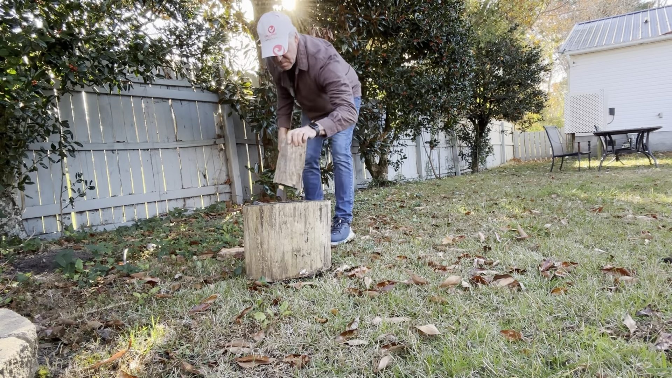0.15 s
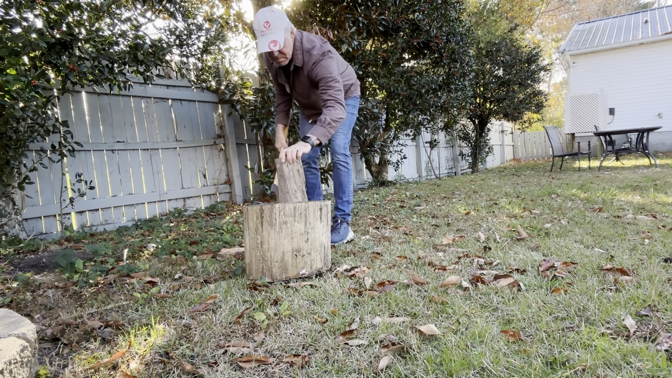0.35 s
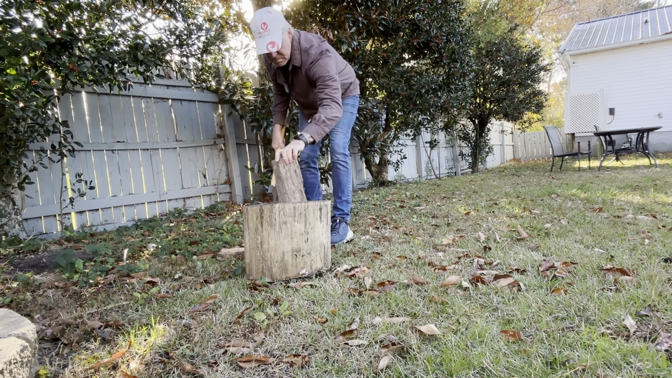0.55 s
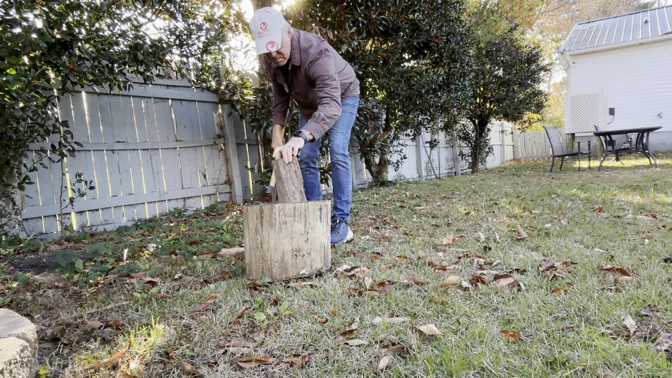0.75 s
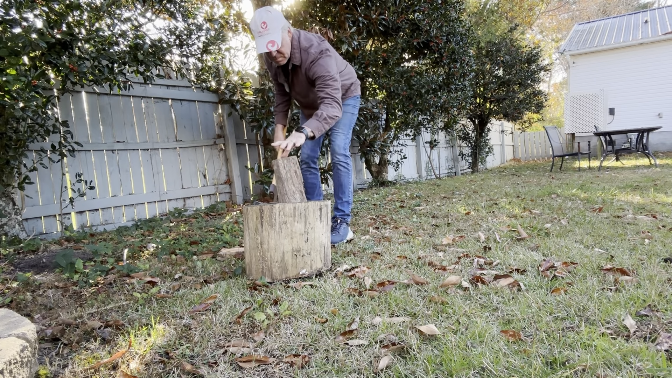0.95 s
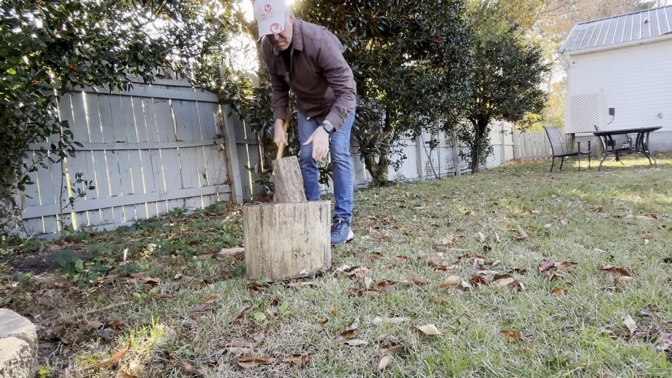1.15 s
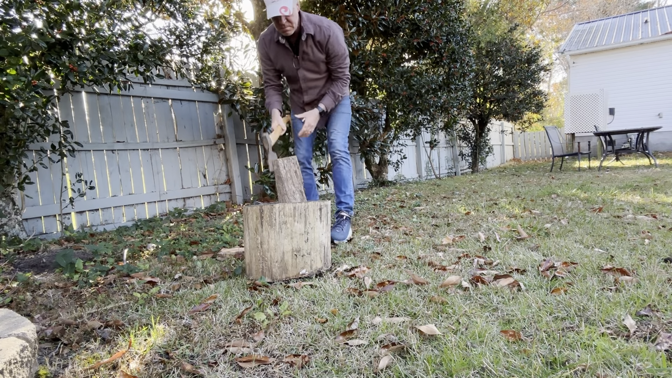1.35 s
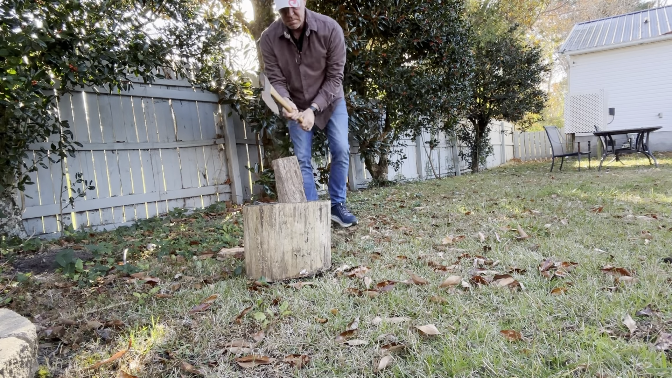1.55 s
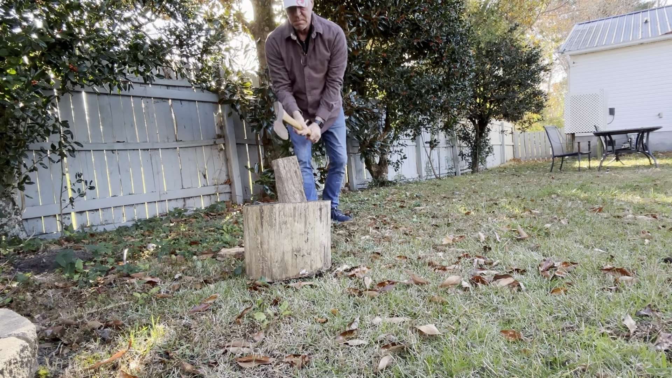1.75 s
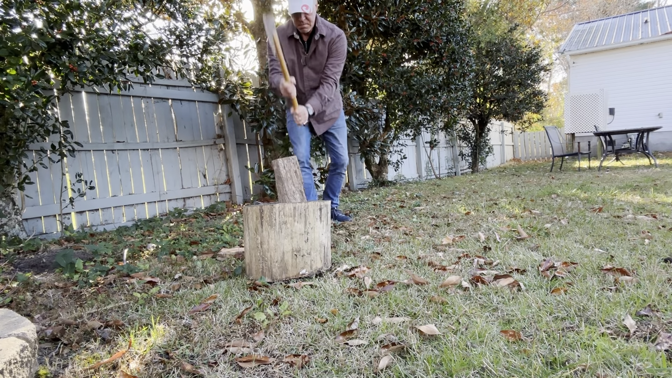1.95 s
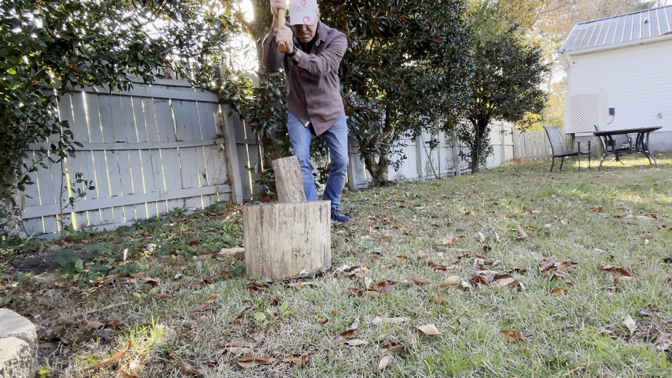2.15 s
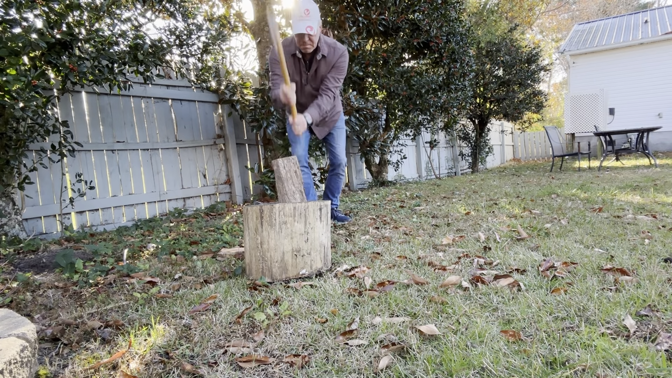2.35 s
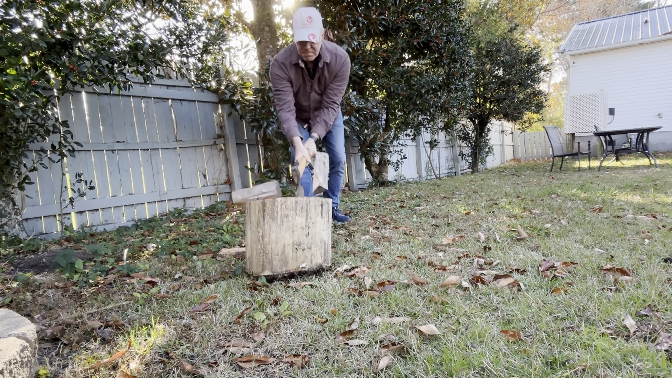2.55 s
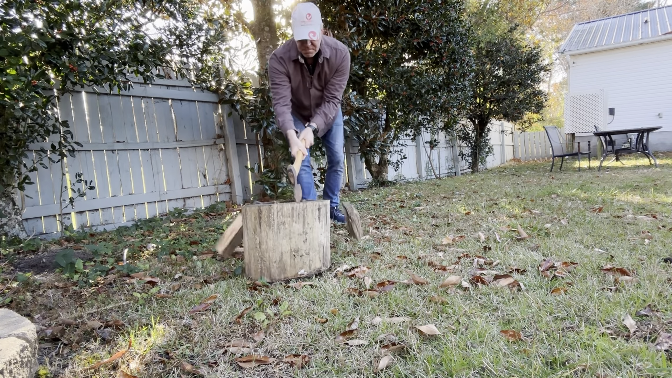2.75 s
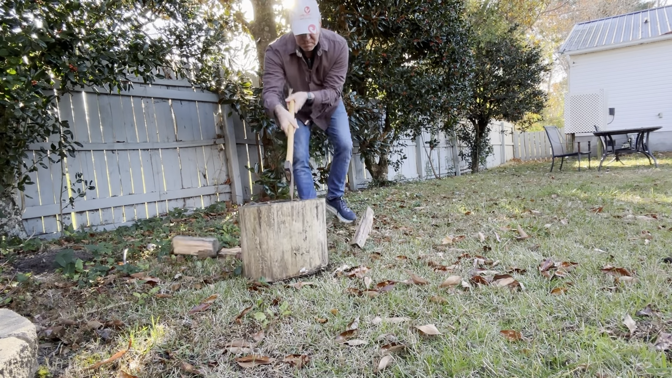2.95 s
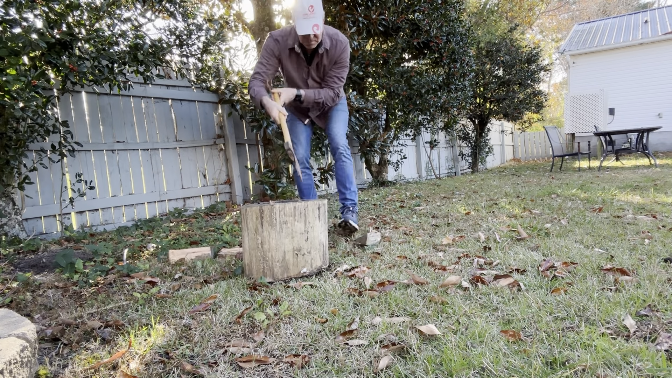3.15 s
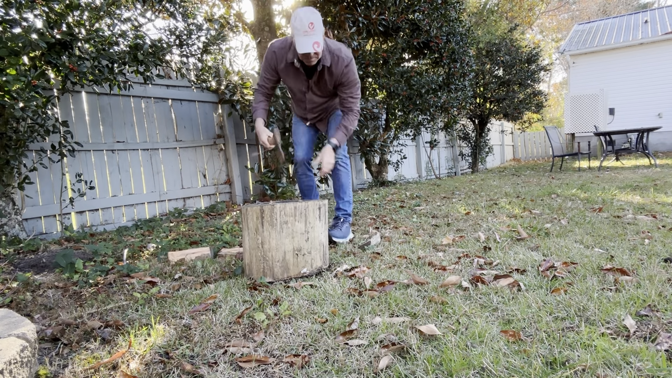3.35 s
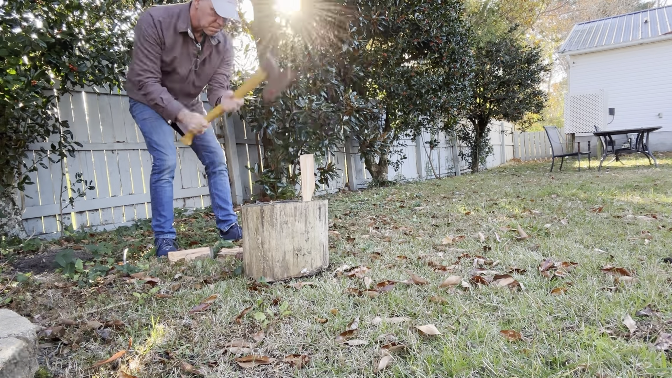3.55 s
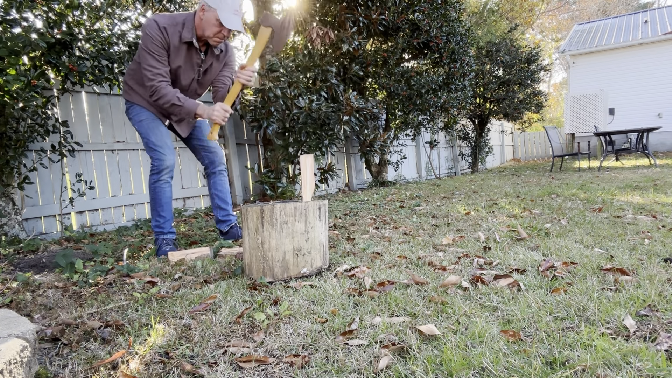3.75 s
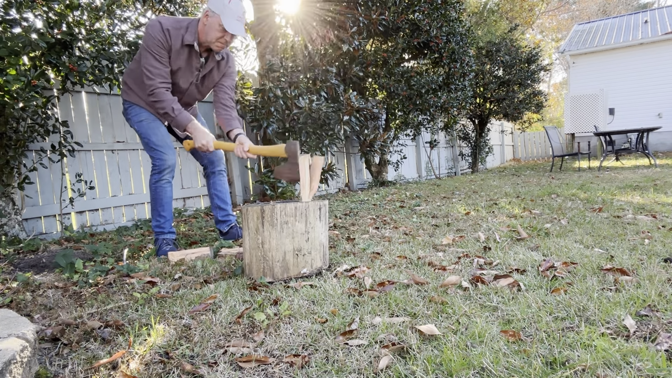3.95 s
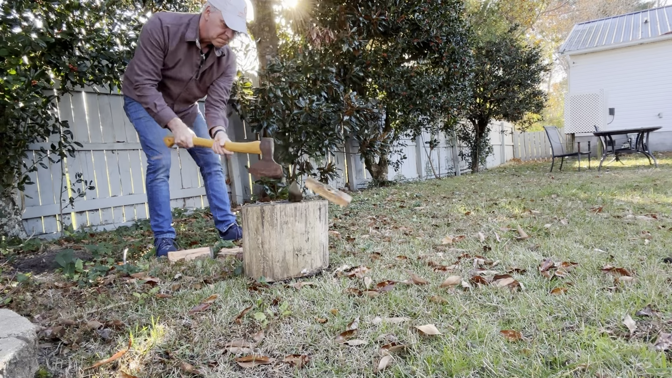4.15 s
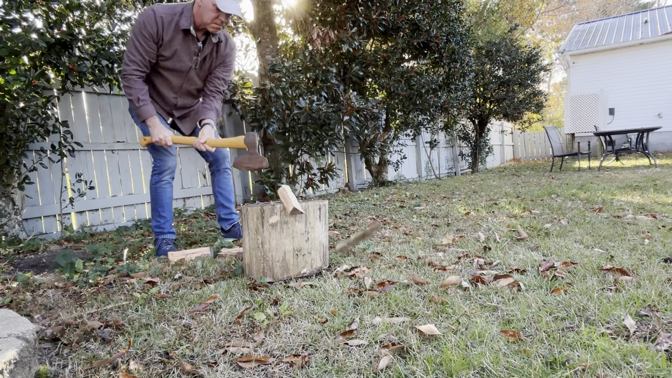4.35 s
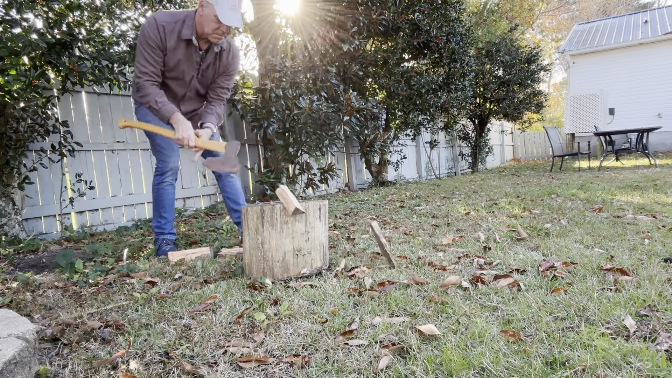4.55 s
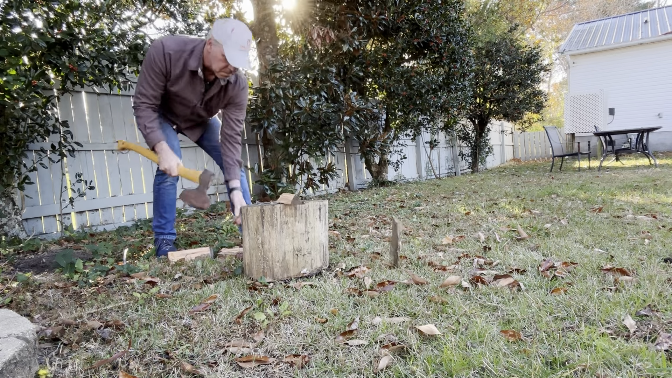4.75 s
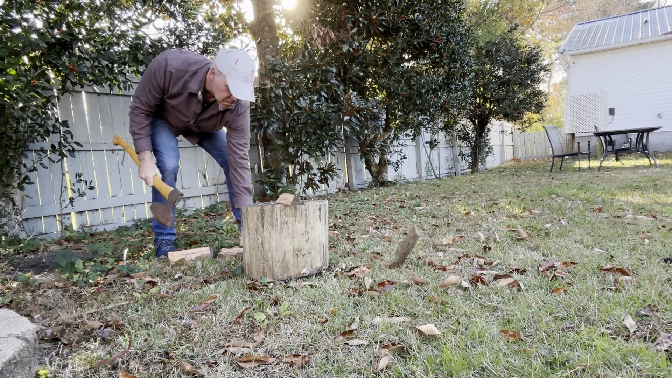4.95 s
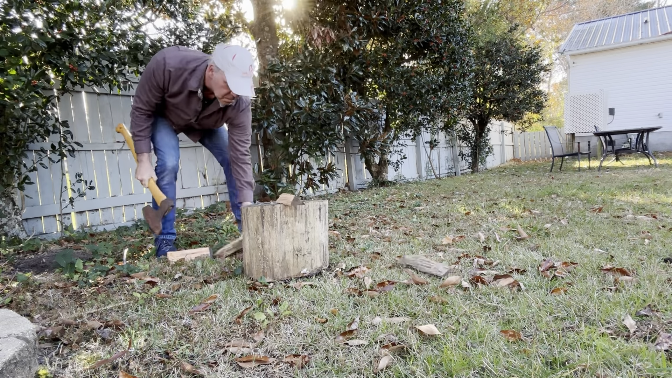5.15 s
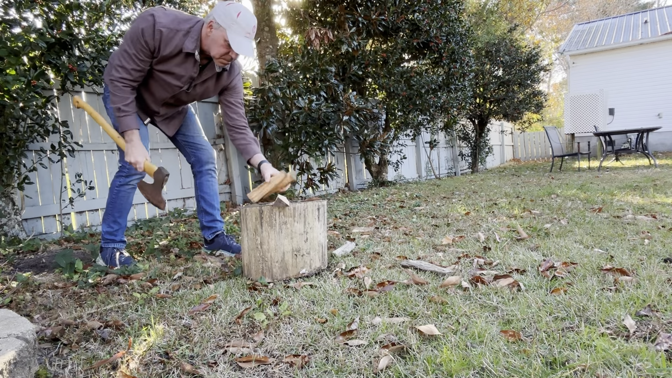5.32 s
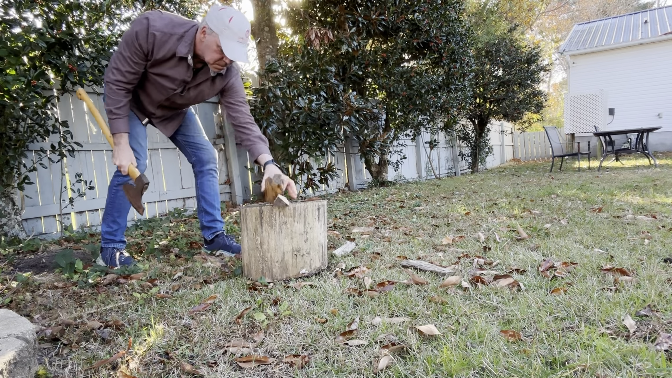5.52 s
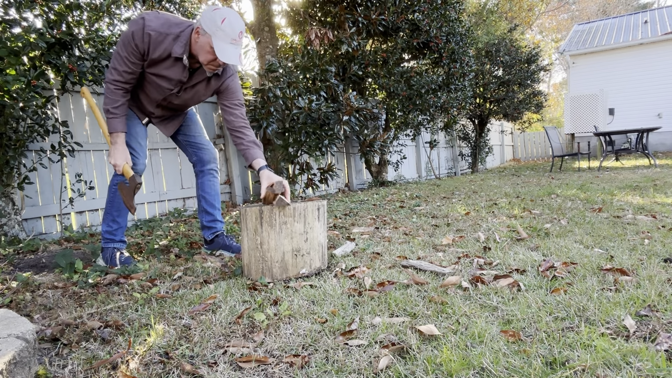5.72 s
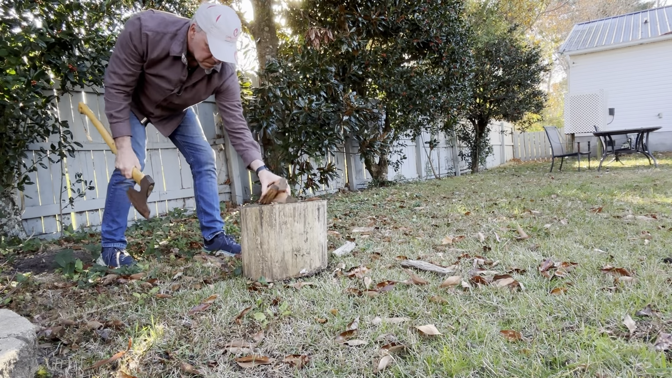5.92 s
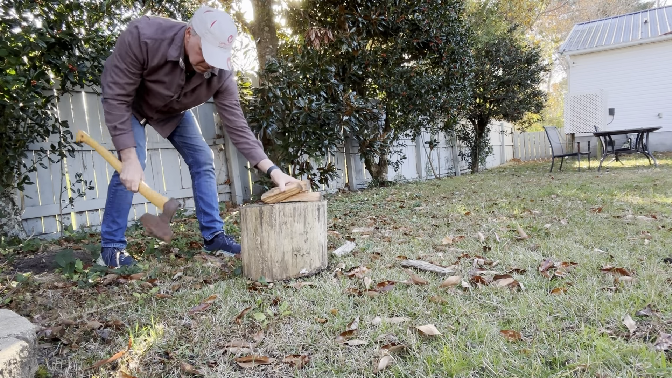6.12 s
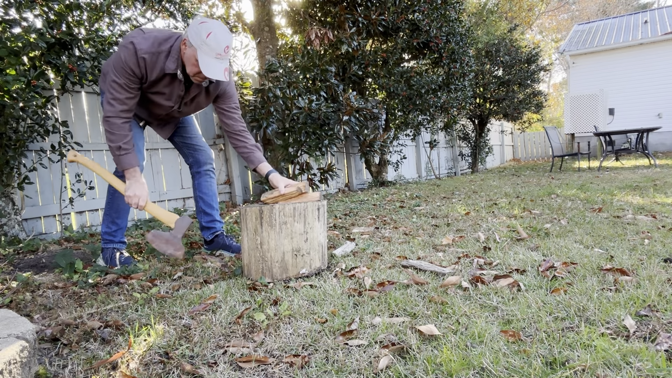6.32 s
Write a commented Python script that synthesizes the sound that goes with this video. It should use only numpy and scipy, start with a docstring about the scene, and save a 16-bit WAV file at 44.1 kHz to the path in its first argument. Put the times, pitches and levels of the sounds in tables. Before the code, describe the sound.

A low outdoor rumble, a steady machine hum and distant traffic run throughout. A far engine swells three times in the first two seconds and sinks to idle. There is a faint wooden tap at 0.4 seconds, and feet shuffle softly in dry leaves around 1.3 to 1.7. At 2.4 a hatchet splits wood on a stump, near and slightly left: a loud crack and thump with a short backyard echo. The halves knock on the stump and crunch into leaves between 2.5 and 3.1, followed by light steps. A second, brighter chop with splintering snaps and a quick fence echo lands at 3.9. Pieces clatter until 4.3 and drop into leaves around 4.5, amid more shuffling. From 5.5 to 6.2, kindling quietly taps and scrapes on the stump. The engine fades near 5.9 while the hum continues.

```python
"""A hatchet splits kindling on a stump in a fenced backyard, over a steady hum and distant traffic.
First a far engine swells and sinks to idle while feet shuffle through dry leaves. At 2.4 s the blade
lands: a crack and a falling thump that fence and trees throw back, then the halves knock on the stump
and drop into the leaves. A second chop follows at 3.9 s. Last, kindling scrapes and taps on the stump
among more shuffling, and the engine fades away."""
import sys
import numpy as np
from scipy import signal
from scipy.fft import rfft, irfft
from scipy.io import wavfile
from scipy.ndimage import uniform_filter1d

SR = 44100
rng = np.random.default_rng(int(sys.argv[2]) if len(sys.argv) > 2 else 0)


def inscribe(sig):
    """Save sig as 16-bit PCM at rate SR to the path in sys.argv[1].

    A 1-D sig is mono; a 2-D sig holds one channel per row.
    Samples are clipped to [-1, 1] before scaling.
    """
    pcm = np.round(np.clip(np.atleast_2d(sig).T, -1, 1) * 32767)
    wavfile.write(sys.argv[1], SR, pcm.astype(np.int16))


N = 281358
TIME = np.arange(N) / SR

# The two chops. Each row: start in seconds, crack level in dB, rise in seconds, tilt in dB per octave,
# tear level in dB, tear decay in seconds, yard level in dB, yard tilt in dB per octave, fence echo in dB.
CHOP_CUES = [(2.4393, -10, 0.00072, -0.5, -41, 0.035, 13.5, -1.57, -16),
             (3.8979, -12, 0.0014, 1.65, -26.5, 0.012, 3, 1.95, 5)]
# The tone of cracking wood. Each row: frequency in Hz, relative level in dB.
CRACK_EQ = [(200, -13.5), (700, -0.5), (1200, 11), (1600, -14), (2200, -3.5), (3200, -9), (5000, 0.5),
            (7000, -4.5), (8500, -11), (10500, -14), (13000, -6.5), (16000, -21)]

def chops():
    """The blade bursts the wood open and the fibres tear; gives the near sound and the yard's answer."""
    near, far = np.zeros((2, 2, N))
    t = np.arange(SR // 3) / SR
    for s, crack_db, rise, tilt_db, tear_db, tear_decay, yard_db, yard_tilt_db, fence_db in CHOP_CUES:
        burst = crackle(len(t), spread_db=-0.5, apart=0.5)
        crack = unit_rms(coloured(burst, CRACK_EQ, tilt_db)) * swell(t, rise)
        jerks = smooth_noise(len(t), samples=60)  # the fibres give way in bundles
        fibres = patchy(crackle(len(t), spread_db=7, apart=0.5), depth_db=4)
        fibres = coloured(fibres * gain_of(4 * np.minimum(jerks, 2)), CRACK_EQ, tilt_db)
        tear = unit_rms(fibres) * np.exp(-t / tear_decay) * (1 - np.exp(-t / rise))
        add(near, s, gain_of(crack_db) * crack + gain_of(tear_db) * tear)
        add(far, s, gain_of(yard_db) * yard(yard_tilt_db, fence_db))
    return near, far


# Hits on wood, by the blade or a loose piece. Each row: start in seconds, thump level in dB,
# starting pitch in Hz, natural-log growth of the period per cycle, rise in seconds.
KNOCK_CUES = [(0.354, -41.5, 450, 0.93, .0024), (2.4402, -5.5, 950, 0.274, 0.0018),
              (2.452, -27.5, 350, 0.046, 0.0046), (2.4743, -13, 980, 0.38, 0.0018),
              (2.4836, -12, 195, 0.62, 0.0045), (2.523, -44, 900, 0.27, .002),
              (2.573, -16, 273, 0.12, 0.0028), (2.677, -37, 340, 0.165, 0.0046),
              (2.803, -29.5, 454, .45, 0.0098), (3.8979, -11, 947, 0.22, 0.0027),
              (3.9071, -12, 331, 0.047, 0.0023), (4.116, -30.5, 937, 0.26, 0.0021),
              (4.137, -36, 486, 0.12, 0.0016), (4.1959, -20, 1160, 0.15, 0.00052),
              (4.207, -32, 315, 0.14, 0.0017), (4.278, -32.5, 565, 0.13, 0.0021),
              (5.526, -43, 672, 0.16, 0.0036), (5.552, -38, 710, 0.39, 0.0046),
              (5.567, -43, 625, 0.067, .0044), (5.926, -45.5, 317, .02, 0.0054)]

def knocks():
    """A blow sends a thump through the wood; its highs arrive first, so the pitch falls."""
    out, t = np.zeros((2, N)), np.arange(SR // 3) / SR
    for s, thump_db, hz, growth, rise in KNOCK_CUES:
        # Harder and higher knocks ring and tick more; a usual one is -30 dB at 500 Hz.
        force_db, octaves = thump_db + 30, np.log2(hz / 500)
        ring_db = -38.5 + 0.7473 * force_db + octaves
        tick_db = -54.5 + 0.64 * force_db + 6.5 * octaves
        turns = np.log1p(growth * hz * t) / growth
        bumps = unit_rms(uniform_filter1d(smooth_noise(len(t), samples=110), size=80))
        contact = 1 + 0.187 * bumps  # rough faces touch unevenly
        thump = np.sin(2 * np.pi * turns) * swell(t, rise) * contact
        burst = crackle(len(t), spread_db=-0.5, apart=0.41)
        tick = unit_rms(coloured(burst, CRACK_EQ, tilt_db=-1)) * swell(t, rise=0.0023)
        ring = wood_ring(t, hz)
        add(out, s, gain_of(thump_db) * thump + gain_of(tick_db) * tick + gain_of(ring_db) * ring)
    return out


# The ring of billet and stump. Each row: pitch in Hz, relative level in dB, seconds to fall 60 dB.
WOOD_MODES = [(323, 9, 0.057), (352, -13, 0.11), (466.3, 12, 0.049), (514, -6.5, 0.061), (610, -11, 0.069),
              (732, 5, 0.046), (802, -13, 0.066), (892, -11.5, 0.049), (1250, -31.5, 0.027),
              (1340, -6.5, 0.051), (1536, -10.5, 0.12), (1960, -8.5, 0.088), (2008, -13, 0.029),
              (2670, -17.5, .08), (3480, -20, .1)]

def wood_ring(t, knock_hz):
    """The wood's modes ring on, with slightly different tuning and phase for every blow."""
    hz, db, t60 = np.transpose(WOOD_MODES)[:, :, None]
    phase, detune, skew = rng.standard_normal((3, len(WOOD_MODES), 1))
    angle = 2 * np.pi * (hz * (1 + 0.011 * detune) * t + phase)
    dull_db = 5.5 * np.maximum(np.log2(hz / knock_hz), 0)  # a soft blow hardly wakes the high modes
    fade = gain_of(db - dull_db - 60 * t / t60) * (1 - np.exp(-t / 0.00022))
    return np.array([(fade * np.sin(angle + side * skew)).sum(0) for side in (-0.5, 0.5)]) / 2


# Snaps as the halves part. Each row: start in seconds, level in dB, tilt in dB per octave.
SNAP_CUES = [(2.456, -37, 7), (2.4653, -29.5, -4), (2.4928, -42, 12), (2.5012, -46.5, 12),
             (2.5232, -35.5, -2.5), (3.9022, -17, 6), (3.9036, -26, 15)]

def splinters():
    """The last fibres snap, each with a very short burst."""
    out, t = np.zeros((2, N)), np.arange(SR // 20) / SR
    for s, db, tilt_db in SNAP_CUES:
        burst = coloured(crackle(len(t), spread_db=-4, apart=0.21), CRACK_EQ, tilt_db)
        add(out, s, gain_of(db) * unit_rms(burst) * swell(t, rise=0.0012))
    return out


# Kindling dragged over the stump. Each row: start in seconds, level in dB, rise in seconds.
SCRAPE_CUES = [(4.4872, -47, 0.0025), (5.521, -51, 0.0075), (5.552, -50.5, 0.012), (5.68, -58, 0.024),
               (5.86, -56.5, 0.036), (5.921, -48, 0.0054), (6.07, -56.5, 0.016), (6.142, -56.5, 0.022)]
# The hollow tone of the drag. Each row: frequency in Hz, relative level in dB.
SCRAPE_EQ = [(200, 6), (500, 9.5), (1200, -16), (1950, -1), (2900, -14.5), (4000, -3.5), (6000, -15),
             (15000, -31.5)]

def scrapes():
    """Rough wood slips over the end grain in tiny jerks."""
    out, t = np.zeros((2, N)), np.arange(SR // 3) / SR
    for s, db, rise in SCRAPE_CUES:
        rasp = coloured(crackle(len(t), spread_db=6, apart=0.64), SCRAPE_EQ)
        add(out, s, gain_of(db) * unit_rms(rasp) * swell(t, rise))
    return out


# The stump's stereo placement. Each row: frequency in Hz, left over right in dB.
STUMP_PAN = [(200, -2.5), (700, -1.5), (1300, 9.5), (2800, 15), (5000, 1.5), (7000, 13), (9500, 1),
             (15000, 2)]

def direct(pair, lag_s):
    """The stump stands a little to the left, so its sound reaches the right microphone later."""
    left, right = rfft(pair)
    hz = bins(pair)
    lean = gain_of(curve_at(STUMP_PAN, hz) / 2)
    delay = np.exp(-2j * np.pi * hz * lag_s)
    return irfft(np.array([left * lean, right / lean * delay]), N)


# A foot or sleeve brushing the leaves. Each row: start in seconds, level in dB, seconds to its peak.
SHUFFLE_CUES = [(0.0, -82, .2), (1.16, -82, .12), (1.325, -54, 0.082), (1.585, -54.5, 0.053),
                (2.85, -61, 0.19), (3.06, -67, 0.033), (3.15, -59, 0.064), (3.35, -64.5, 0.071),
                (3.62, -78, .18), (4.275, -63, 0.029), (4.4, -55.5, 0.08), (4.501, -57, 0.056),
                (4.62, -73, 0.11), (4.939, -62, 0.098), (5.064, -62.5, 0.067), (5.175, -68, 0.05),
                (5.55, -63, 0.013), (5.62, -72, 0.15), (5.82, -72, 0.14), (6.059, -64.5, .06)]
# The crisp tone of dry leaves. Each row: frequency in Hz, relative level in dB.
LEAF_EQ = [(300, -24.5), (1500, -11), (3300, -6), (5300, 1), (7200, 1.5), (9000, -5), (10500, -7.5),
           (11800, 5), (14200, -2), (16000, -13.5)]

def shuffles():
    """Dry leaves crackle softly under shuffling feet and stir faintly between steps."""
    sweep_power = 2.37  # a sweep starts more softly and ends sooner than a blow
    sweeps = [gain_of(db) * swell(np.maximum(TIME - s, 0), rise) ** sweep_power
              for s, db, rise in SHUFFLE_CUES]
    pressure = gain_of(-90) + np.linalg.norm(sweeps, axis=0)
    grains = unit_rms(coloured(crackle(N, spread_db=6, apart=1), LEAF_EQ, tilt_db=-1.5))
    return panned(pressure * grains * gain_of(1.2 * drift(rate_hz=120)), side_db=2)


# Leaf crunches. Each row: start in seconds, level in dB, rise in seconds, tilt in dB per octave.
CRUNCH_CUES = [(1.118, -66.5, 0.018, -7), (1.526, -49, 0.0012, -2), (1.597, -55.5, 0.0063, -1),
               (1.645, -50.5, 0.017, -5.5), (2.783, -42.5, 0.011, -2), (3.0, -45, 0.0057, -4.5),
               (3.022, -36.5, 0.0022, -2), (3.068, -45, 0.0069, -2.5), (4.028, -60, 0.0012, 5),
               (4.406, -47.5, 0.0064, -1), (4.4872, -43.5, 0.0042, -6.5), (4.571, -41, 0.0013, 13),
               (5.195, -55, .004, -3), (6.25, -63.5, 0.0018, -2)]

def crunches():
    """Under a foot or a falling piece one leaf after another gives way, crackling in clumps."""
    out, t = np.zeros((2, N)), np.arange(SR // 3) / SR
    for s, db, rise, tilt_db in CRUNCH_CUES:
        clumps_db = 2.5 * np.minimum(smooth_noise(len(t), samples=70), 2.6)
        grains = patchy(crackle(len(t), spread_db=9.5, apart=0.93), depth_db=1.5)
        crunch = unit_rms(coloured(grains * gain_of(clumps_db), LEAF_EQ, tilt_db))
        add(out, s, panned(gain_of(db) * crunch * swell(t, rise), side_db=4.5))
    return out


# The tone of the yard's reverb. Each row: frequency in Hz, gain in dB.
YARD_EQ = [(100, 7), (400, 8.5), (750, 2), (1150, 1), (2000, -1.5), (3500, -3), (5000, -3.5), (7000, -5.5),
           (10000, -12.5), (16000, -22)]
# The length of its tail. Each row: frequency in Hz, seconds to fall 60 dB.
YARD_DECAY = [(150, 0.28), (700, 0.46), (2000, 0.64), (4500, 0.6), (7500, 0.48), (11000, 0.37),
              (16000, 0.19)]

def yard(tilt_db, fence_db, fence_s=0.055):
    """The yard's answer to a click: trees and ground scatter a tail, the fence returns a smeared echo."""
    scatter = patchy(rng.standard_normal((2, SR)), depth_db=3)
    hz, frame_s, bands = signal.stft(scatter, SR, nperseg=256)
    decay = gain_of(-60 * frame_s / curve_at(YARD_DECAY, hz)[:, None])
    tail = signal.istft(bands * decay, SR, nperseg=256)[1][:, :SR]
    t = np.arange(SR) / SR
    fence = gain_of(fence_db) * np.exp(-((t - fence_s) / 0.0025) ** 2)
    ground = 1.6 * np.exp(-t / 0.032)
    tail = tail * (1 - np.exp(-t / 0.0059)) * (1 + ground + fence)
    return diffuse(coloured(tail / np.linalg.norm(tail[0]), YARD_EQ, tilt_db))


# The engine slowing to idle. Each row: time in seconds, pitch in Hz.
ENGINE_PITCH = [(0, 75.15), (.3, 65.08), (.95, 64.96), (1.25, 53.29), (6.38, 57.7)]
# Its three swells. Each row: peak time in seconds, level in dB, half length in seconds.
ENGINE_SWELL_CUES = [(.45, -43, 0.33), (1.427, -43, .15), (2.084, -44, 0.19)]

def engine(idle_db=-47.5, gone_s=5.92, fade_s=0.06):
    """The low note of a far engine wavers, swells, sinks to idle and fades away."""
    hz = np.interp(TIME, *np.transpose(ENGINE_PITCH)) * (1 + 0.021 * drift(rate_hz=7.2))
    note = np.sqrt(2) * np.sin(2 * np.pi * np.cumsum(hz) / SR)
    idle = gain_of(idle_db) * (1 - np.tanh((TIME - gone_s) / fade_s)) / 2
    swells = sum(gain_of(db) * np.exp(-((TIME - s) / half) ** 2) for s, db, half in ENGINE_SWELL_CUES)
    return panned(note * (idle + swells) * gain_of(0.51 * drift(rate_hz=18)), side_db=-3.5)


def machine_hum(hz=239.9, db=-51):
    """An outdoor machine holds one slightly wavering note."""
    note = np.sqrt(2) * np.sin(2 * np.pi * hz * TIME + 0.22 * drift(rate_hz=5))
    return panned(note * gain_of(db + 0.77 * drift(rate_hz=5.4)), side_db=-2.5)


# The fader ride on the traffic. Each row: time in seconds, level in dB.
TRAFFIC_RIDE = [(0, -58.5), (.7, -59.5), (1.3, -54), (1.9, -53.5), (2.3, -54.5), (3.3, -56), (4.7, -57),
                (6.38, -54)]
# The tone of the road. Each row: frequency in Hz, relative level in dB.
ROAD_EQ = [(100, -32.5), (450, -8.5), (850, -4), (1100, -9), (1700, -15.5), (3000, -27.5), (8000, -50.5)]

def traffic():
    """Far traffic blends into a wash that slowly rises and falls."""
    wash = unit_rms(diffuse(coloured(rng.standard_normal((2, N)), ROAD_EQ)))
    return wash * gain_of(np.interp(TIME, *np.transpose(TRAFFIC_RIDE)))


# The tone of the outdoor bed. Each row: frequency in Hz, relative level in dB.
AIR_EQ = [(20, -47), (35, -19.5), (55, -5), (85, -9), (130, -5.5), (175, -14), (250, -15.5), (310, -23),
          (480, -31), (1000, -26.5), (2500, -41.5), (4000, -47.5), (5300, -45), (6000, -51), (7500, -52.5),
          (10000, -62.5), (15000, -83)]

def neighbourhood(db=-43):
    """The neighbourhood rumbles almost evenly from all round."""
    rumble = unit_rms(diffuse(coloured(rng.standard_normal((2, N)), AIR_EQ)))
    return rumble * gain_of(db + 0.097 * drift(rate_hz=6.3))


# The width of the ambience. Each row: frequency in Hz, left-right correlation from -1 to 1.
AMBIENCE_CORRELATION = [(95, 1), (135, 0.72), (290, -0.38), (640, -0.56), (1410, -0.33), (3100, 0.25),
                        (6820, -0.2), (15000, 0.4)]
# Its balance. Each row: frequency in Hz, left over right in dB.
AMBIENCE_PAN = [(60, -2.5), (200, -2), (700, 1.5), (1290, -4.5), (2380, -3.5), (4400, -7.5), (8120, -1),
                (15000, -7.5)]

def diffuse(pair):
    """Two unrelated signals become sound that reaches the microphones from all round."""
    a, b = rfft(pair)
    hz = bins(pair)
    same = np.clip(curve_at(AMBIENCE_CORRELATION, hz), -1, 1)
    lean = gain_of(curve_at(AMBIENCE_PAN, hz) / 2)
    right = same * a + np.sqrt(1 - same ** 2) * b
    return irfft(np.array([a * lean, right / lean]), pair.shape[-1])


def crackle(length, spread_db, apart):
    """Countless tiny snaps of uneven size, partly different in each channel."""
    common, left, right, sizes = rng.standard_normal((4, length))
    return (common + apart * np.array([left, right])) * gain_of(spread_db * np.minimum(sizes, 2.5))


def patchy(x, depth_db):
    """Many small parts ring briefly, each at its own pitch: uneven patches in time and frequency."""
    bands = signal.stft(x, SR, nperseg=256)[2]
    patches = uniform_filter1d(rng.standard_normal(bands.shape[1:]), size=3, axis=0)
    patches = unit_rms(uniform_filter1d(patches, size=4, axis=1))
    return signal.istft(bands * gain_of(depth_db * patches), SR, nperseg=256)[1][:, :x.shape[-1]]


def smooth_noise(length, samples):
    """Noise under a moving average, at rms 1."""
    return unit_rms(uniform_filter1d(rng.standard_normal(length), size=samples))


def drift(rate_hz):
    """A slow random wander of rms 1."""
    return unit_rms(irfft(rfft(rng.standard_normal(N)) * np.exp(-(bins(TIME) / rate_hz) ** 2), N))


def swell(t, rise):
    """Climbs to 1 at the rise time, then dies away."""
    return t / rise * np.exp(1 - t / rise)


def coloured(x, eq, tilt_db=0):
    """Applies an EQ curve, plus a tilt per octave above 1 kHz."""
    hz = bins(x)
    db = curve_at(eq, hz) + tilt_db * np.log2(np.maximum(hz, 1000) / 1000)
    return irfft(rfft(x) * gain_of(db), x.shape[-1])


def curve_at(points, hz):
    """Reads a table on a log-frequency axis."""
    point_hz, value = np.transpose(points)
    return np.interp(np.log(hz + 1), np.log(point_hz + 1), value)


def bins(x):
    """The frequencies of a signal's spectrum."""
    return np.fft.rfftfreq(x.shape[-1], 1 / SR)


def gain_of(db):
    """Decibels to a factor."""
    return 10 ** (np.asarray(db) / 20)


def unit_rms(x):
    """Scales to rms 1."""
    return x / np.sqrt(np.mean(x ** 2) + 1e-20)


def panned(x, side_db):
    """Sets the left channel side_db above the right."""
    return x * gain_of([[side_db / 2], [-side_db / 2]])


def add(mix, s, sound):
    """Mixes a stereo sound in at s seconds."""
    part = mix[:, max(round(s * SR), 0):][:, :sound.shape[-1]]
    part += sound[:, :part.shape[1]]


def scene():
    """Wood and leaves play up front and echo in the yard, over the outdoor bed."""
    near, far = chops()
    wood = knocks() + splinters() + scrapes()
    rustle = shuffles() + crunches()
    send = gain_of(-27.5) * wood[:1] + gain_of(-17.5) * rustle[:1]
    reverb = signal.fftconvolve(send, yard(tilt_db=4.5, fence_db=-7.5), axes=1)[:, :N]
    bed = neighbourhood() + traffic() + machine_hum() + engine()
    return direct(near + wood, lag_s=0.00008) + rustle + far + reverb + bed


# Brief dips in the whole mix. Each row: centre in seconds, depth in dB, width in seconds.
LEVEL_DIPS = [(3.585, 24, 0.012), (5.283, 27, 0.01)]

def record(dry):
    """The sharpest peaks are rounded off, the level dips briefly twice and the top is cut at 16 kHz."""
    rounded = dry / (1 + dry ** 6) ** (1 / 6)
    dip_db = sum(depth * np.exp(-abs(TIME - s) / width) for s, depth, width in LEVEL_DIPS)
    low_pass = signal.firwin(255, 16000, window=("kaiser", 9), fs=SR)
    return signal.oaconvolve(rounded * gain_of(-dip_db), low_pass[None], "same")


dry = scene()
out = record(dry)
inscribe(out)
```